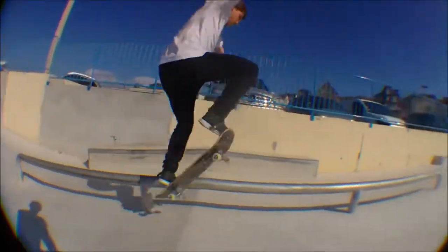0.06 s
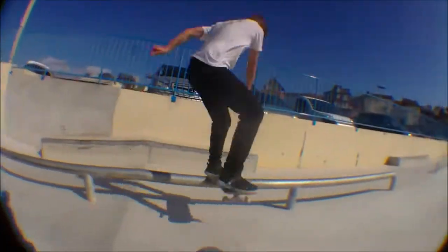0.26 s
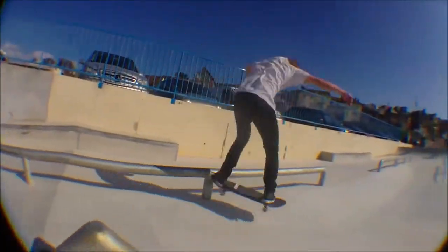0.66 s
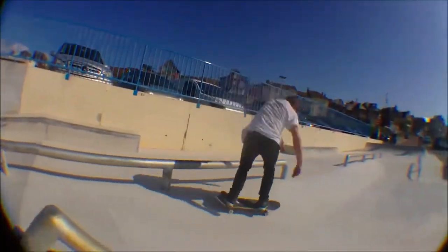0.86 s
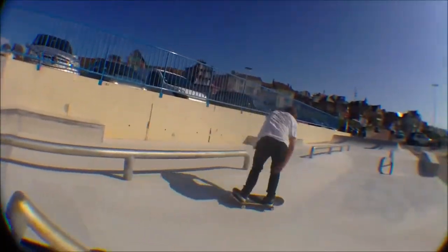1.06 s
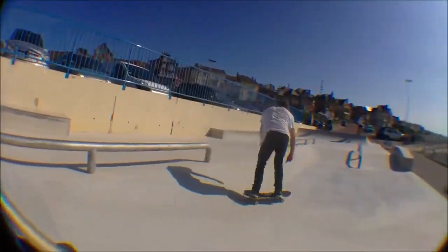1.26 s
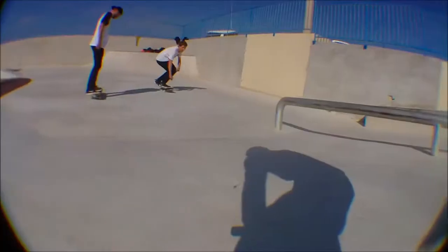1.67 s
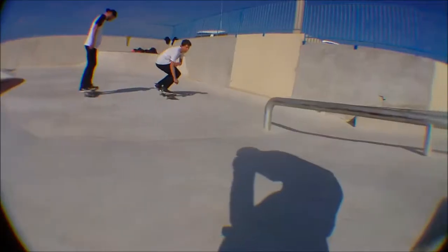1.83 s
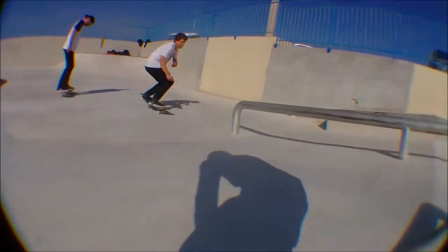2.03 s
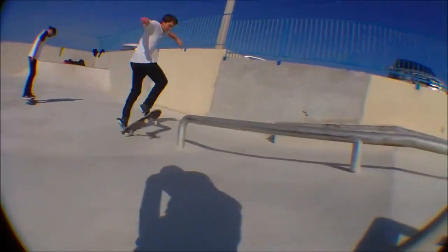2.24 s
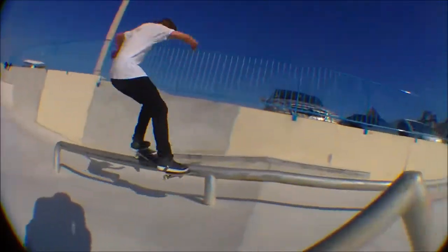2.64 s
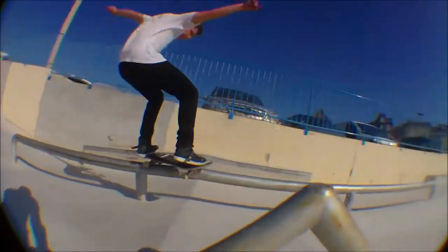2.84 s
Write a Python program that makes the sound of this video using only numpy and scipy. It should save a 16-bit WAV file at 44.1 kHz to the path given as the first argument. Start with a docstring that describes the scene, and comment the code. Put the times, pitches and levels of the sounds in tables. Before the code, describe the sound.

Two skateboard slides on a steel rail, with sharp clacks, ringing and wheels rolling between.

```python
"""Hard wheels roll on concrete and a shoe scuffs the grip tape, then a skateboard truck clacks onto a rail.
It rasps along the steel, sticking and slipping into a groan and a squeal, and rubs the tube into song.
The board thuds down and rolls away while the rail rings on. After a brief dip in level it rolls up
over a joint, the tail pops, the wheels spin in the air and the truck lands for a second slide."""
import sys
import numpy as np
from scipy import signal
from scipy.fft import rfft, irfft, next_fast_len
from scipy.io import wavfile

SR = 44100
rng = np.random.default_rng(int(sys.argv[2]) if len(sys.argv) > 2 else 0)


def persist_wave(psi):
    """Save psi, clipped to +-1, as 16-bit WAV."""
    counts = np.round(np.clip(psi, -1, 1) * 32767).astype(np.int16)
    wavfile.write(sys.argv[1], SR, np.atleast_2d(counts).T)


N = 127890
T = np.arange(N) / SR
FFT_SIZE = 2 * next_fast_len(N * 3 // 5)
FFT_HZ = np.maximum(np.arange(FFT_SIZE // 2 + 1) * SR / FFT_SIZE, 1)

# Levels in the tables are relative; each layer's trim comes on top.
# Tone colours: f/Hz, level/dB
AIR_EQ = [(30, -35.5), (80, -10.5), (160, -1), (500, 2.5), (1200, -1.5), (3000, -11), (9000, -26),
          (15000, -26.5)]  # outdoor air
ROLL_EQ = [(50, -54), (140, -22), (270, -16), (330, -14), (420, -2.5), (700, 0), (1000, -4.5), (1400, -3.5),
           (2000, -20.5), (2800, -29), (4000, -27.5), (6500, -31), (9200, -33), (10500, -40), (15500, -44)]  # wheels on concrete
SCUFF_EQ = [(300, -20), (1800, -23), (2600, -2), (3400, 2), (5200, -4), (7000, -19), (15000, -36)]  # shoe on grip tape
THUD_EQ = [(24, -38), (40, -45), (183, -18.5), (310, -15.5), (593, 1.5), (976, -5.5), (1130, -4), (1570, 0),
           (1870, -9), (2580, -18), (4370, -23.5), (7370, -24), (15600, -39.5)]  # wheel hitting concrete
POP_EQ = [(60, -65), (404, -26), (700, -7), (1070, -2), (1560, -6), (1830, -12), (2210, -12.5), (2660, -15),
          (3100, -13.5), (4240, -9), (5400, -11), (6590, -25), (9130, -23), (15600, -38)]  # tail hitting the ground
WASH_EQ = [(80, -52), (250, -25), (500, -8), (1100, -2), (2000, -12), (2800, 4), (4200, -11.5),
           (5300, -5.5), (7000, -15), (9000, -16.5), (15000, -49)]  # the rail's countless weak modes
CLACK_EQ = [(24, -53), (40, -32), (208, -17.5), (1080, 0.5), (2220, -1.5), (2460, 5), (3000, 0.5),
            (3760, 6), (4700, -6.5), (5600, -1), (6670, -9.5), (14100, -21.5), (15600, -29)]  # truck hitting steel
SLIDE_EQ = [(60, -1.5), (250, 0), (500, 4), (660, 3), (1050, 9), (1280, 4), (1500, 5.5), (1850, -2),
            (2100, -2), (2400, -11.5), (2560, 1), (2750, -11.5), (3250, -10.5), (3600, -7.5), (4050, -12),
            (7000, -18), (9000, -18.5), (11000, -23.5), (15000, -31)]  # truck scraping steel

# Rumble, body, rattle and hiss bands of the wheels: low/Hz, high/Hz
ROLL_BANDS = [(50, 270), (270, 1100), (1100, 2500), (2500, 16000)]
# Wheel faders for each stretch of the ride: t/s, rumble/dB, body/dB, rattle/dB, hiss/dB
RUN_UP = [(0.0, -50, -62, -25.5, -32.5), (0.008, -51.5, -43.5, -40.5, -38.5),
          (0.102, -51, -43.5, -42.5, -58.5), (0.14, -44, -38.5, -44, -36), (0.16, -45, -38.5, -37.5, -40.5),
          (0.218, -49, -43, -44, -40.5), (0.22, -71, -26, -50, -34.5)]
ROLL_AWAY = [(0.79, -77, -46, -63, -67), (0.976, -86, -43, -48.5, -53), (1.068, -60, -41, -44.5, -47),
             (1.178, -52.5, -37.5, -37.5, -47), (1.306, -52.5, -32, -40.5, -41.5),
             (1.402, -51, -37, -35, -41.5), (1.57, -51, -36.5, -37.5, -46.5)]
APPROACH = np.vstack([ [(1.605, -59, -34.5, -47, -54), (1.613, -46, -33.5, -43, -54),
            (1.653, -54, -31, -43.5, -49.5), (1.829, -59, -31, -40.5, -54), (1.835, -56, -33, -39, -50)],
            [(1.9, -48, -31, -38, -47), (1.97, -53.5, -28.5, -41.5, -45.5), (2.13, -48.5, -29, -36, -39.5),
            (2.198, -58, -36.5, -34.5, -39), (2.238, -50, -37, -40, -48)], ])
SPINNING = [(2.3, -51, -45, -38.5, -43.5), (2.404, -75, -48, -52.5, -60), (2.438, -70, -69, -47, -54),
            (2.458, -74, -63, -52, -55), (2.475, -55, -55, -44, -50)]
# Wheels landing or crossing a joint: t/s, level/dB, tilt/(dB per octave), decay/s
WHEEL_HITS = [(0.0576, -28, -1, 0.0024), (0.7445, -5, -1, 0.0011), (0.7486, -11.5, 2, 0.006),
              (0.7551, -11.5, 1.5, 0.0058), (0.767, -19.5, -1, 0.0061), (0.843, -32, 0, 0.013),
              (1.239, -22.5, -2, 0.0059), (1.456, -19.5, -1.5, 0.0086), (1.616, -28, -1, 0.0041),
              (1.85, -21.5, 0, 0.012), (1.858, -17.5, -1, 0.012), (1.872, -21.5, -2.5, 0.0075),
              (2.427, -40, 0.5, 0.014), (2.4865, -18.5, 0.5, 0.0078)]
# Hollow ring of the deck: f/Hz, popped/dB, landed/dB, t60/s
DECK_MODES = [(540, -15.5, -16, 0.049), (618, -22, -15, 0.056), (729, -9, -6, 0.047),
              (1072, -1, -19, 0.043), (1537, -9.5, -13, 0.05), (2210, -18, -25, 0.025),
              (4300, -3, -34, 0.01)]

# Truck strikes on the rail: t/s, clack/dB, tilt/(dB per octave), bite/Hz, truck ring/dB, rail ring/dB
RAIL_HITS = [(0.2261, -1.5, -1, 1910, -7.5, -33), (0.2576, -15, -6.5, 1640, -39, -34),
             (0.433, -32, -3, 1400, -51, -53), (0.722, -39, 1, 4500, -55, -44),
             (2.489, -0.5, -0.1, 1216, -30, -16.5), (2.5839, -19, 0.5, 1380, -53, -35),
             (2.618, -25, -8, 2880, -48, -44), (2.893, -27.5, -13, 1410, -42, -36)]
# Ring of axle and hanger: f/Hz, level/dB, t60/s
TRUCK_MODES = [(1830, -5, 0.075), (2493, -4.5, 0.036), (4350, 1.5, 0.013), (5060, -6, 0.024),
               (7850, -19, 0.1)]
# The rail with the board on it: f/Hz, struck/dB, t60/s, rubbed/dB
RAIL_MODES = [(897.3, -9, 1.27, 2), (943, -19, 1.45, -10), (981, -7, 0.47, -4), (1008.5, -11, 1.35, -2.5),
              (1076, -7.5, 0.32, -13.5), (1384, -17, 0.15, -16), (1440, -14, 0.46, -23),
              (1580, -16, 0.25, -45), (2530, -17.5, 0.91, -18.5), (2575, -22, 0.4, -23),
              (2770, -8, 0.41, -38), (2880, -11, 0.2, -48), (2955, -9, 0.29, -43), (3212, -10.5, 0.28, -43),
              (3660, -22, 0.48, -38.5), (4810, -14.5, 0.55, -43), (4930, -12, 0.24, -34.5),
              (5160, -9, 0.17, -44), (5430, -7.5, 0.18, -49), (7400, -30, 0.4, -54)]
# How hard the slide rubs the rail: t/s, level/dB, brightness/(dB per octave)
RUBBING = [(0.23, -35, -1), (0.3, -29.5, 7.5), (0.39, -24.5, 4), (0.5, -23.5, -3), (0.62, -22.5, -10),
           (0.742, -23, -11), (0.775, -39, -7), (0.85, -84, -4), (2.5, -93, 12), (2.72, -58, 9),
           (2.82, -40, 6), (2.9, -44.5, 14)]
# The rail once the board has left: f/Hz, level/dB, t60/s (before the gain curve)
FREE_MODES = [(898.7, 0, 21.6), (973.5, -11.5, 5.7), (981, 3.5, 1.43), (1020, -5, 0.93), (1070, -17, 1.9)]
# The recorder's gain recovering after the landing, drawn on that ring alone: t/s, level/dB
RING_GAIN_RECOVERY = [(0.735, -60), (0.76, -34.5), (0.83, -30.5), (0.96, -25.5), (1.1, -20.5),
                      (1.25, -18.5), (1.42, -19), (1.57, -17.5)]

# Rumble, body, rasp, hiss and sizzle bands of the slide: low/Hz, high/Hz
SLIDE_BANDS = [(55, 330), (360, 850), (850, 2700), (2700, 8300), (8300, 16000)]
# Faders of the first slide: t/s, body/dB, rasp/dB, hiss/dB, sizzle/dB
FIRST_SLIDE = [(0.247, -31, -27, -37, -37), (0.261, -44, -18, -31, -33), (0.279, -28, -26.5, -41, -38),
               (0.295, -40, -22, -31.5, -38.5), (0.353, -45, -26.5, -30, -40),
               (0.379, -32, -29, -42.5, -49), (0.405, -49, -43, -54, -72), (0.427, -46, -47, -55, -49),
               (0.433, -46, -31, -43, -47), (0.493, -34.5, -29, -46, -49), (0.519, -45, -30, -40.5, -38),
               (0.561, -45, -36.5, -45, -39), (0.597, -49, -45, -56, -67), (0.629, -49, -50, -53, -73),
               (0.681, -61, -56, -61, -80), (0.697, -45, -36.5, -48, -76), (0.715, -33, -46.5, -50, -76)]
# Faders of the second slide: t/s, rumble/dB, body/dB, rasp/dB, hiss/dB, sizzle/dB
SECOND_SLIDE = [(2.6, -55.5, -37, -34, -46, -52), (2.718, -46.5, -57, -44.5, -52.5, -79),
                (2.764, -46, -60, -52, -54.5, -62), (2.788, -49, -38, -41.5, -40.5, -59.5),
                (2.88, -43, -52.5, -40.5, -47.5, -55), (2.9, -55, -57, -29.5, -42, -45)]
# Strength of the stick-slip judder: t/s, level/dB
JUDDER_LEVEL = [(0.25, -39), (0.264, -14), (0.284, -32), (0.297, -30), (0.316, -17), (0.362, -20.5),
                (0.385, -44), (0.425, -49), (0.456, -22.5), (0.495, -53), (0.545, -36), (0.61, -52.5)]
# Its pitch: t/s, f/Hz
JUDDER_PITCH = [(0.255, 561), (0.275, 620.5), (0.308, 518.3), (0.35, 503), (0.372, 458), (0.39, 502.5),
                (0.55, 516.5)]

SQUEAL_S, SQUEAL_DB = (0.308, 0.3614), [-16.5, -33, -28.5, -32]  # start and end; harmonics 2 to 5
SCUFF_S, LEAVE_RAIL_S, POP_S = 0.131, 0.745, 2.2655
DIP_START_S, DIP_END_S = 1.5765, 1.599


def from_db(db):
    """Decibels to gain."""
    return 10 ** (np.asarray(db) / 20)


def unit_rms(x):
    """Scale to an rms of one."""
    return x / np.sqrt(np.mean(x ** 2) + 1e-20)


def curves(rows):
    """One automation curve for each column after the time."""
    times, *columns = np.transpose(rows)
    return [np.interp(T, times, column) for column in columns]


def gate(start, end, fade):
    """Fully open between two times, fading outside them."""
    return np.clip(1 + np.minimum(T - start, end - T) / fade, 0, 1)


def drift(rate_hz):
    """Smooth random wobble of unit rms."""
    spectrum = rfft(rng.standard_normal(FFT_SIZE))
    return unit_rms(irfft(spectrum / (1 + (FFT_HZ / rate_hz) ** 2))[:N])


def colour(x, eq, tilt_db=0, bite_hz=None, bite_db=8):
    """EQ with a tilt per octave above 500 Hz and an optional peak; white noise keeps its power."""
    hz, db = np.transpose(eq)
    shape_db = np.interp(np.log(FFT_HZ), np.log(hz), db) + tilt_db * np.log2(np.maximum(FFT_HZ, 500))
    if bite_hz:
        shape_db += bite_db * np.exp(-(np.log2(FFT_HZ / bite_hz) / 0.4) ** 2)
    # minimum phase keeps attacks free of pre-ring
    cepstrum = irfft(np.log(unit_rms(from_db(shape_db))))
    cepstrum[1:FFT_SIZE // 2] *= 2
    cepstrum[FFT_SIZE // 2 + 1:] = 0
    return irfft(rfft(x, FFT_SIZE) * np.exp(rfft(cepstrum)))[:N]


def ring(start, hz, t60):
    """One struck mode, dying away from full height."""
    age = np.maximum(T - start, 0)
    return np.sin(2 * np.pi * hz * age) * from_db(-np.minimum(60 * age / t60, 200))


def burst(start, hold, decay, tail_db, tail_t60):
    """A chattering contact of even force, then its scatter from the surrounding concrete."""
    age = np.maximum(T - start, 0)
    contact = np.exp(-np.minimum(np.maximum(age - hold, 0) / decay, 20)) * rng.choice([-1, 1], N)
    scatter = from_db(tail_db - np.minimum(60 * age / tail_t60, 200)) * rng.standard_normal(N)
    return (T >= start) * (contact + scatter)


def grit(per_s, spread_db, smooth=1.0):
    """Tiny collisions of uneven size over smooth friction noise."""
    sizes = from_db(spread_db * np.minimum(rng.exponential(1, N), 4)) * rng.choice([-1, 1], N)
    collisions = unit_rms(sizes * (rng.random(N) < per_s / SR))
    return unit_rms(collisions + smooth * rng.standard_normal(N))


def ride_bands(source, bands, faders):
    """Split a noise into bands and ride each on its own fader."""
    filters = [signal.butter(4, band, "band", fs=SR, output="sos") for band in bands]
    parts = [unit_rms(signal.sosfilt(sos, source)) for sos in filters]
    return sum(part * from_db(db) for part, db in zip(parts, curves(faders)))


def radiate(x, low_hz):
    """Small bodies radiate little bass."""
    return signal.sosfilt(signal.butter(2, low_hz, "high", fs=SR, output="sos"), x)


def through_board(x, ring_db=-6.5, t60=0.043):
    """Direct friction noise plus its short ring in the many small modes of deck and truck."""
    age = T[:SR // 8]
    response = rng.standard_normal(len(age)) * from_db(-60 * age / t60)
    return x + from_db(ring_db) * signal.fftconvolve(x, response / np.linalg.norm(response))[:N]


def outdoor_air():
    """A faint, steady bed of noise."""
    return from_db(-49) * colour(rng.standard_normal(N), AIR_EQ)


def wheels():
    """Hard wheels run over the grain of the concrete, sharper as they carve away, and spin in the jump."""
    texture = through_board(grit(per_s=5000, spread_db=2, smooth=1.22)) * from_db(1.2 * drift(35))
    rolling = colour(texture, ROLL_EQ)
    carving = colour(texture, ROLL_EQ, bite_hz=2600, bite_db=3.5)
    return (ride_bands(rolling, ROLL_BANDS, RUN_UP) * gate(0, 0.225, 0.013)
            + ride_bands(carving, ROLL_BANDS, ROLL_AWAY) * gate(0.78, 1.58, 0.025)
            + ride_bands(rolling, ROLL_BANDS, APPROACH) * gate(1.595, 2.265, 0.033)
            + ride_bands(rolling, ROLL_BANDS, SPINNING) * gate(2.285, 2.49, 0.0092))


def shoe_scuff():
    """The shoe drags up the grip tape in one short, bright scrape."""
    scrape = burst(SCUFF_S, hold=0.005, decay=0.0018, tail_db=-3.5, tail_t60=0.081)
    return from_db(-28) * colour(scrape, SCUFF_EQ)


def board_hits():
    """Wheels thud and the tail pops on the concrete; both knock a hollow ring out of the deck."""
    thuds = deck = 0
    for start, db, tilt_db, decay in WHEEL_HITS:
        contact = burst(start, hold=0.0013, decay=decay, tail_db=-24, tail_t60=0.21)
        thuds += from_db(db) * colour(contact, THUD_EQ, tilt_db)
    snap = burst(POP_S, hold=0.0015, decay=0.0011, tail_db=-12, tail_t60=0.081)
    pop = from_db(-6.5) * colour(snap, POP_EQ)
    for hz, popped_db, landed_db, t60 in DECK_MODES:
        deck += from_db(popped_db - 9.5) * ring(POP_S, hz, t60)
        for start, db, _, _ in WHEEL_HITS:
            deck += from_db(db + landed_db - 3) * rng.choice([-1, 1]) * ring(start, hz, t60)
    return thuds + pop + radiate(deck, low_hz=460)


def free_rail():
    """The tube's close modes beat and ring on, louder as the recorder's gain recovers from the landing."""
    modes = sum(from_db(db) * ring(LEAVE_RAIL_S, hz, t60) for hz, db, t60 in FREE_MODES)
    gain_db, = curves(RING_GAIN_RECOVERY)
    return modes * from_db(gain_db + 2.5) * (T < DIP_START_S)


def rail_wash(trim_db=-9.5, t60=0.44):
    """Each strike wakes the rail's countless weak modes, which fade as one wash of noise."""
    wash = 0
    for start, *_, db in RAIL_HITS:
        envelope = from_db(db + trim_db - 60 * np.maximum(T - start, 0) / t60) * (T >= start)
        wash += envelope * rng.standard_normal(N)
    return colour(wash, WASH_EQ)


def ridden_rail():
    """Under the truck, the steel tube rings when struck and sings when rubbed."""
    rubbing_db, brightness = curves(RUBBING)
    lowest_hz, first_hit_s = RAIL_MODES[0][0], RAIL_HITS[0][0]
    struck = sung = 0
    for hz, struck_db, t60, rubbed_db in RAIL_MODES:
        blows = sum(from_db(db + struck_db + rng.normal(0, 1)) * ring(start, hz, t60)
                    for start, *_, db in RAIL_HITS)
        struck += blows * from_db(-2 + 1.5 * drift(20))  # the riding truck damps it unevenly
        song_db = rubbing_db + rubbed_db + 2 + brightness * np.log2(hz / lowest_hz) + 0.71 * drift(14)
        phase_wobble = (hz / 2400) ** 2 * drift(17)
        sung += from_db(song_db) * np.sin(2 * np.pi * hz * T + phase_wobble)
    return struck + sung * (T > first_hit_s)


def truck_clacks():
    """Metal meets metal: a hard crack, each with its own bite, and the short ring of the truck."""
    cracks = truck = 0
    for start, clack_db, tilt_db, bite_hz, truck_db, _ in RAIL_HITS:
        contact = burst(start, hold=0.0015, decay=0.0015, tail_db=-14.5, tail_t60=0.12)
        cracks += from_db(clack_db) * colour(contact, CLACK_EQ, tilt_db, bite_hz)
        truck += sum(from_db(truck_db + db) * ring(start, hz, t60) for hz, db, t60 in TRUCK_MODES)
    return cracks + radiate(truck, low_hz=700)


def juddering_slide():
    """The truck sticks and slips on the steel: it groans, chops the rasp and squeals at its hardest."""
    pitch_hz, = curves(JUDDER_PITCH)
    groan_db, = curves(JUDDER_LEVEL)
    phase = 2 * np.pi * np.cumsum(pitch_hz * (1 + 0.019 * drift(90))) / SR
    groan = np.sin(phase) * from_db(groan_db + 2 * drift(47))
    squeal = sum(from_db(db + 2.5 * drift(53)) * np.sin(harmonic * phase + 0.5 * drift(56))
                 for harmonic, db in enumerate(SQUEAL_DB, 2))
    chopped = grit(per_s=1500, spread_db=3.3) * (1 + 0.16 * np.sin(phase))
    scrape = colour(through_board(chopped), SLIDE_EQ) * from_db(1.1 * drift(62))
    rasp = ride_bands(scrape, SLIDE_BANDS[1:], FIRST_SLIDE)
    return (rasp + groan + squeal * gate(*SQUEAL_S, 0.017)) * gate(0.258, 0.736, 0.0042)


def smooth_slide():
    """On the second run the truck glides over the steel with a finer rasp."""
    scrape = colour(through_board(grit(per_s=2000, spread_db=2.1)), SLIDE_EQ)
    return ride_bands(scrape, SLIDE_BANDS, SECOND_SLIDE) * gate(2.6, 3, 0.035)


def scene():
    """The ride over the outdoor air, in mono; the whole mix dips briefly between the runs."""
    bed = outdoor_air() + wheels()
    slides = juddering_slide() + smooth_slide()
    rail = rail_wash() + ridden_rail() + free_rail()
    hits = truck_clacks() + board_hits() + shoe_scuff()
    dip = from_db(-27 * gate(DIP_START_S + 0.0012, DIP_END_S, 0.0013))
    return ((bed + slides + rail + hits) * dip)[None]


def record(dry):
    """The loudest clacks overload, and a steep low-pass takes off the very top."""
    ceiling, cutoff_hz = 1.02, 15650
    clipped = dry / (1 + (dry / ceiling) ** 16) ** (1 / 16)
    return signal.sosfilt(signal.ellip(12, 0.1, 85, cutoff_hz, fs=SR, output="sos"), clipped)


dry = scene()
out = record(dry)
persist_wave(out)
```